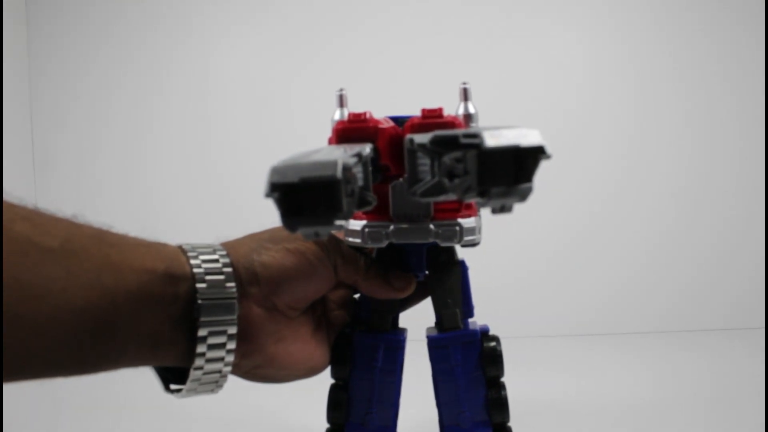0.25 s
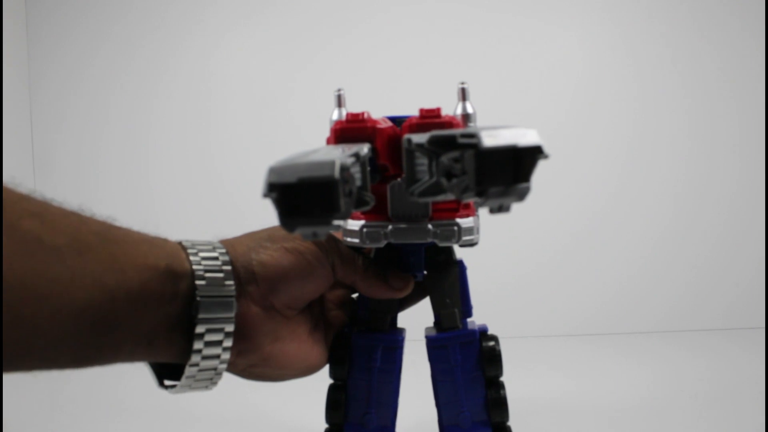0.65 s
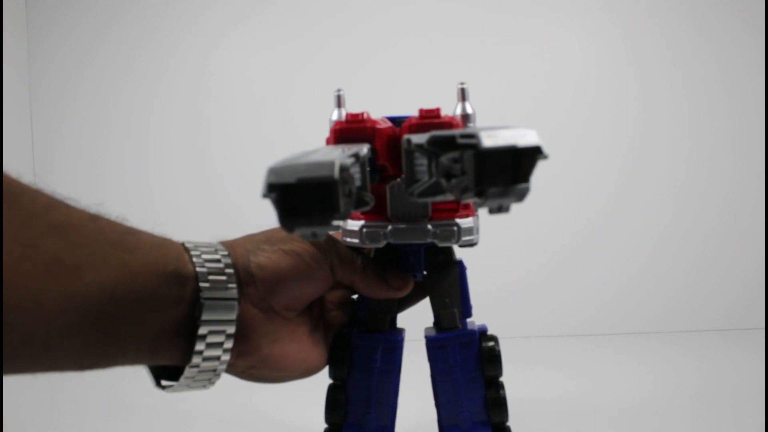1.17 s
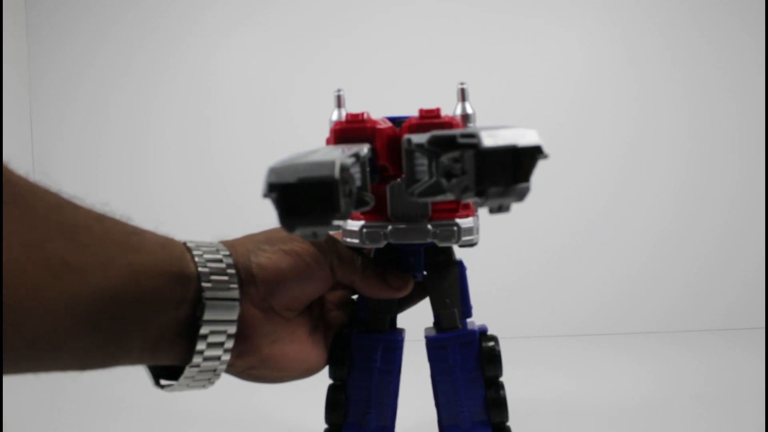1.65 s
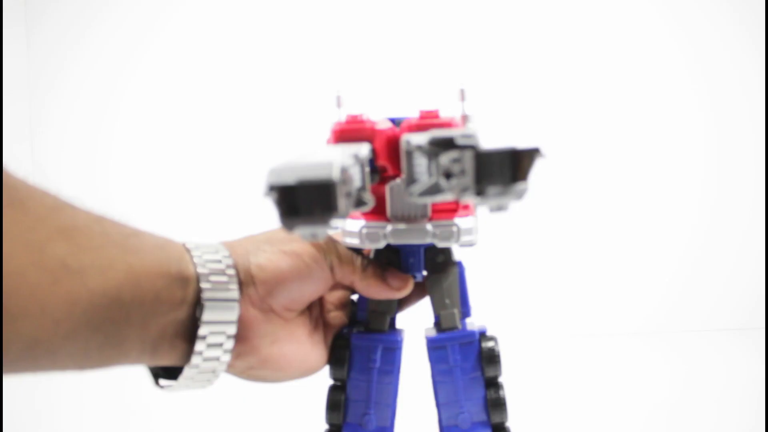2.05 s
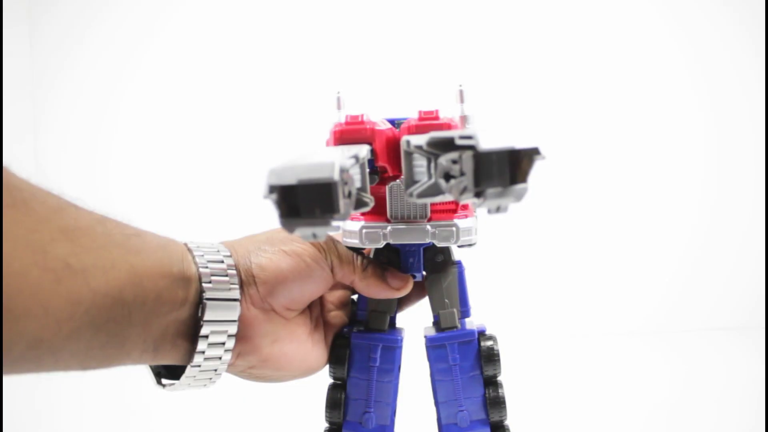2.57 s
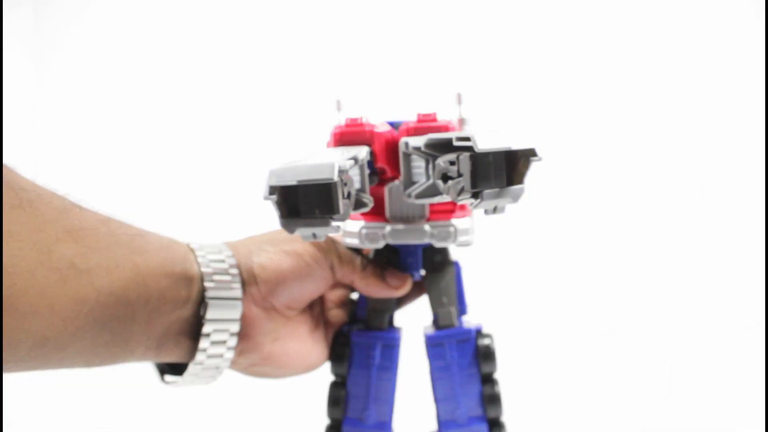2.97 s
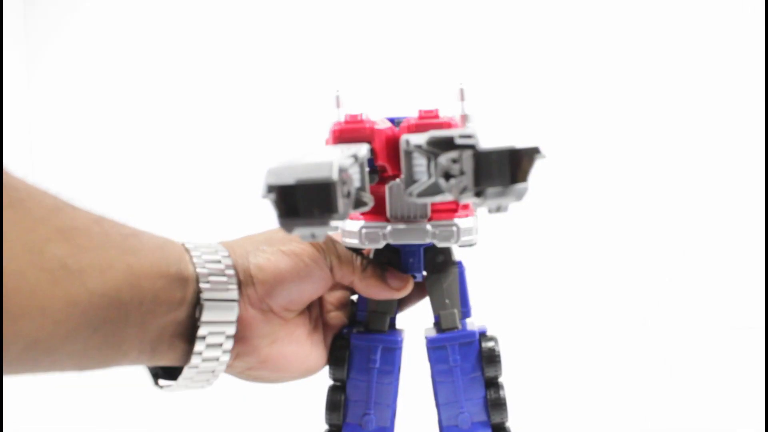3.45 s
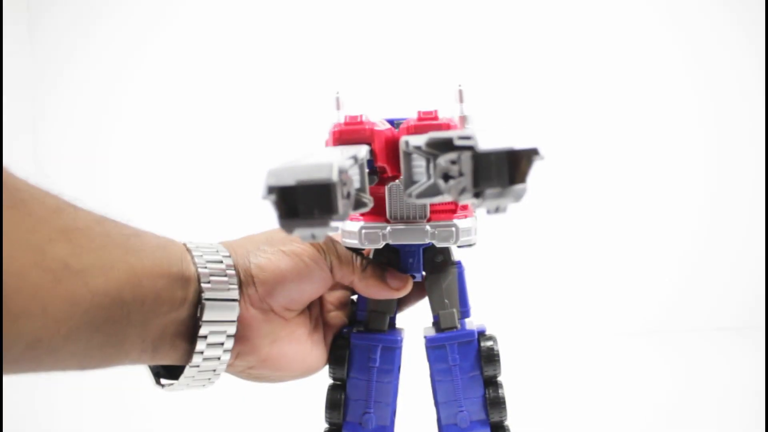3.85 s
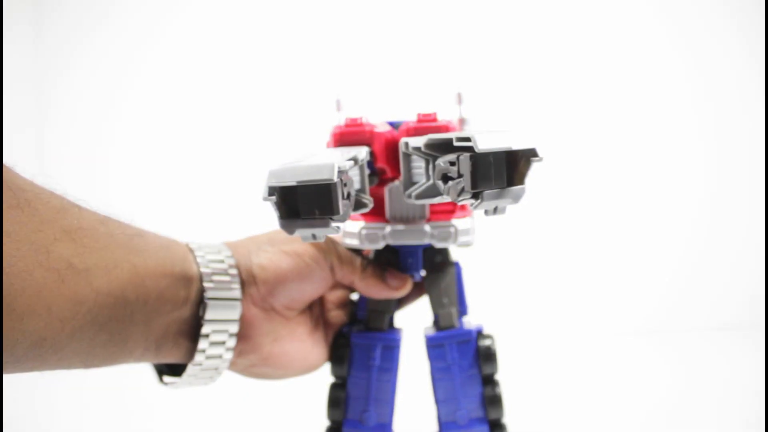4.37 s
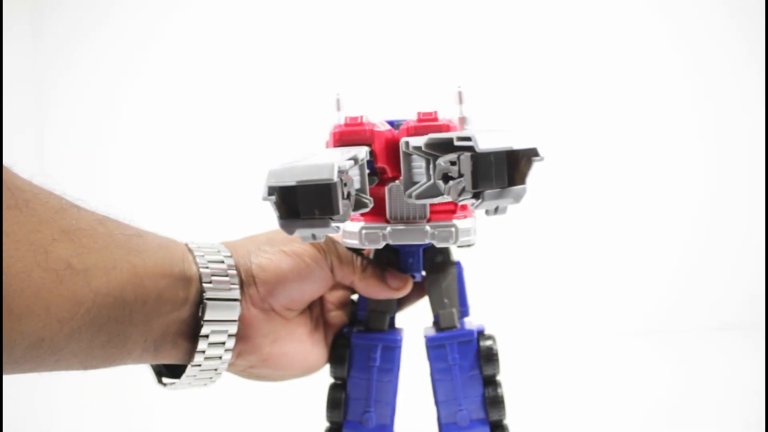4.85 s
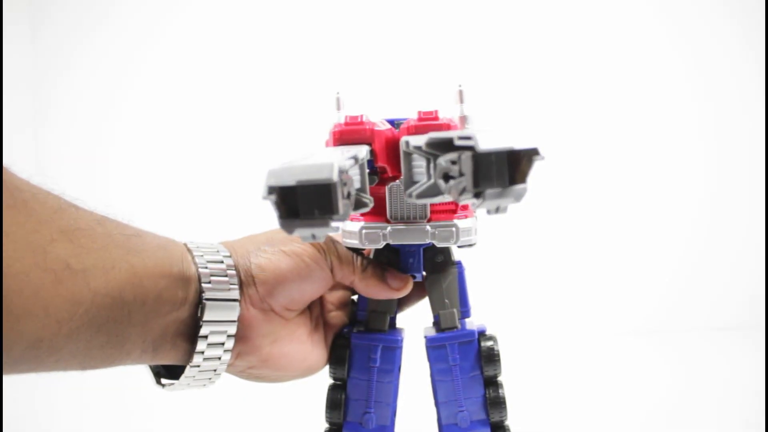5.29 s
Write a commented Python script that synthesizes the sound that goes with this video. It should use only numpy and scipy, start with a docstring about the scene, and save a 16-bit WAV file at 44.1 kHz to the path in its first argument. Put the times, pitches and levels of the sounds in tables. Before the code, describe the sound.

A camera lens clicks and rubs, then its focus motor whirs back and forth in short bursts over faint hiss.

```python
"""A button snaps over faint hiss and electronic whine: a camera hears its own mechanics in a quiet room.
The lens barrel rubs, plastic on plastic, and knocks on its stops. The geared focus motor then hunts,
teeth rattling and whining: two long runs, shorter swings, a row of tiny nudges. The iris steps now and
then in quick zips. The mechanics reach the built-in microphone through the resonant plastic housing."""
import sys
import numpy as np
from scipy import signal
from scipy.fft import rfft, irfft, next_fast_len
from scipy.io import wavfile
from scipy.ndimage import uniform_filter1d, map_coordinates

SR = 44100
rng = np.random.default_rng(int(sys.argv[2]) if len(sys.argv) > 2 else 0)


def transcribe(signal):
    """Save signal, clipped to [-1, 1], as a 16-bit WAV file at the path in sys.argv[1]."""
    frames = np.atleast_2d(signal).T
    limited = np.clip(frames, -1, 1)
    pcm = np.round(limited * 32767).astype(np.int16)
    wavfile.write(sys.argv[1], SR, pcm)


N = 243678

# Noise spectra. Each row: frequency in Hz, relative density in dB.
HISS_SPECTRUM = [(12, -56), (20, -27), (92, -21.5), (129, -7), (191, -21), (225, -8), (362, -12),
                 (549, -12.5), (746, -12.5), (1820, -15.5), (4810, -23), (5380, -24), (12100, -27),
                 (13500, -22.5), (15500, -35.5)]
SCRAPE_SPECTRUM = [(100, -19), (400, -8), (620, -3.5), (900, -5), (1500, -2.5), (2300, -6), (2800, -7.5),
                   (4500, -9), (7000, -18), (12000, -47)]
SLIDE_HISS_SPECTRUM = [(3000, -30), (4800, -12.5), (5450, -1.5), (6600, -13.5), (8500, 1.5), (10800, -0.5),
                       (11300, -12), (12800, -5), (14400, -11), (15700, -31)]
IRIS_SPECTRUM = [(80, -48), (200, -26), (350, -18), (620, -6), (820, -15.5), (1450, 2.5), (1850, -6),
                 (2350, -10), (2900, -9), (4100, -6), (7200, -14), (10000, -19.5), (13500, -20.5),
                 (15500, -36)]
GEAR_GRIND_SPECTRUM = [(30, -45), (100, -21.5), (300, -20.5), (500, -9), (850, -10), (1300, -1.5),
                       (2200, -5), (3300, -5.5), (4700, -6.5), (6500, -10.5), (8000, -17), (12000, -66)]
GEAR_TREBLE_SPECTRUM = [(3000, -48), (5500, -11), (7000, -4), (8500, -3), (11200, -8.5), (11700, -7.5),
                        (13500, -8.5), (15000, -13), (15600, -39)]
GEAR_CREEP_SPECTRUM = [(60, -11), (400, -10.5), (650, -7), (1000, -5.5), (1650, -0.5), (2400, -14),
                       (4500, -14), (5700, -18), (7000, -20.5), (10000, -27.5), (14000, -32)]
# Electronic whine. Each row: frequency in Hz, rms level in dB.
WHINE_TONES = [(360.7, -84), (1647, -88.5), (5001, -90.5), (5997, -94), (8000, -90), (9001, -91),
               (9997, -88), (10998, -92.5), (12995, -96.5), (13997, -93.5)]
# Background dips. Each row: start in seconds, hold in seconds, gain in dB.
BACKGROUND_DIPS = [(2.004, 0.02, -11), (3.607, 0.014, -12)]
# Button and iris snaps. Each row: start in seconds, relative level in dB, chatter t60 in seconds,
# relative thump in dB.
SNAP_HITS = [(0.0095, -24.5, 0.0086, -2), (0.0107, -7.5, .012, 1), (2.2847, -26.5, 0.015, -15),
             (2.287, -19, 0.016, -19.5)]
# Resonances of a snapping part. Each row: centre in Hz, width in Hz, relative level in dB.
SNAP_MODES = [(1490, 340, -3.5), (2050, 400, -7), (3580, 220, -2), (3960, 360, -1.5), (5680, 520, -2),
              (7414, 380, -2), (8930, 330, -1), (9416, 320, 0), (10900, 450, -7.5), (12940, 630, -12)]
# Barrel pushes. Each row: time of full speed, 20 dB rise, hold and 20 dB fall, all in seconds,
# then relative scrape and hiss levels in dB.
BARREL_PUSHES = [(.195, .035, .006, .045, -58.5, -65), (.243, .035, .06, .016, -56.5, -58),
                 (.94, .02, .045, .09, -61.5, -62), (1.151, .075, .003, .04, -62, -59),
                 (1.272, .072, .008, .058, -52, -43), (1.34, .04, .012, .16, -60, -63.5),
                 (1.524, .052, 0.011, .17, -62, -57), (1.937, .055, 0.01, .056, -57, -56)]
# Barrel squeaks. Each row: time of full level in seconds, hold in seconds, pitch in Hz, level in dB.
BARREL_SQUEAKS = [(0.241, .06, 708, -61.5), (1.257, 0.022, 708, -50), (1.52, 0.062, 1205, -65.5)]
# Barrel meeting its stops. Each row: start in seconds, ring peak in dB, relative tick in dB.
STOP_KNOCKS = [(.249, -41, -9), (0.903, -41, 3.5), (0.9067, -40.5, -9), (1.811, -44, -6), (1.9063, -16, -4)]
# Barrel modes. Each row: frequency in Hz, relative level in dB, t60 in seconds.
BARREL_MODES = [(560, -19, 0.041), (766, -30, .022), (960, -17, 0.021), (1250, 3.5, 0.034),
                (1480, 6.5, 0.01), (1690, 3.5, 0.028), (2610, -15.5, 0.048), (3440, -13, 0.015),
                (4960, -5, .011), (5670, -6.5, 0.026)]
# Small contacts. Each row: start in seconds, relative level in dB.
SLIDE_CATCHES = [(1.712, -59.5), (1.814, -49.5), (1.842, -58), (1.85, -55.5), (1.887, -57)]
HOUSING_BUMPS = [(0.245, -54.5), (2.292, -49), (2.78, -52), (3.18, -49), (3.822, -53.5), (4.458, -59),
                 (5.424, -53.5)]
PLASTIC_TICKS = [(0.642, -54), (0.684, -50.5), (0.708, -49), (0.956, -55.5), (0.983, -52), (1.005, -55)]
GEAR_CLACKS = [(2.917, -50), (3.194, -32), (3.925, -52), (4.523, -61), (4.591, -53), (5.515, -43)]
# Iris steps. Each row: start in seconds, hold in seconds, level in dB.
IRIS_STEPS = [(2.2695, 0.014, -44.5), (2.772, .012, -41.5), (3.174, .012, -42.7), (3.805, .006, -44.5),
              (4.44, 0.011, -44), (5.4095, .004, -38.5), (5.512, .005, -41)]
# Focus runs. Each row: start in seconds, powered time in seconds, target shaft speed in Hz, braking fade
# in dB per second, relative drive level in dB, treble and orders 3, 5 and 6 in dB relative to the drive,
# treble flutter depth in dB.
FOCUS_RUNS = [(2.272, 0.069, 221.8, 454, -37.5, -6.5, -19, -20, -21, 1),
              (2.877, .209, 234, 620, -37, -6, -6.7, -24, -32, 0.89),
              (3.173, .306, 223, 820, -35.7, -4.6, -6, -7.7, -7, 2.4),
              (3.803, 0.073, 230.2, 517, -35.5, -8, -10.5, -19, -7, 1),
              (3.944, 0.06, 232.1, 490, -35.2, -8.3, -13.5, -21, -6.5, 1),
              (4.076, 0.036, 219.3, 442, -36.6, -9.5, -22, -22, -17, 1),
              (4.437, 0.023, 215.4, 560, -37, -14, -24, -22, -14.5, 1),
              (5.409, .043, 220, 450, -34.5, -10, -19, -22, -10.5, 1),
              (5.511, .012, 220, 549, -35.5, -1, -22, -20, -18, 1)]
# Strong gear orders. Each row: shaft order, resonance in Hz, half-width in Hz.
STRONG_ORDERS = [(3, 691.4, 46), (5, 1115, 43), (6, 1220, 110)]
# Weak gear orders. Each row: shaft order, relative level in dB.
WEAK_ORDERS = [(1, -14.5), (2, -12), (4, 6), (7, -16), (8, -2), (9, 5), (10, 7.5), (11, -16), (12, -3.5),
               (13, -8), (15, 10), (16, -14), (17, -9), (18, 5), (20, 3.5)]
# Housing resonances. Each row: centre in Hz, width in Hz, lift in dB.
HOUSING_MODES = [(707, 122, 15), (925, 37, 9.5), (1145, 71, 13), (1480, 247, 9.5), (1843, 440, 11),
                 (2402, 93, 11.5), (2705, 184, 15.5), (2903, 173, 11), (3666, 165, 9), (3950, 204, 12),
                 (5300, 470, 10), (5840, 470, 6), (9040, 220, 14.5), (9870, 320, 10.5), (10630, 390, 20),
                 (13200, 600, 9.5)]
# Focus nudges. Each row: start in seconds, nominal length in seconds, relative level in dB.
FOCUS_NUDGES = [(4.578, 0.073, -49.5), (4.674, 0.068, -49), (4.808, 0.058, -48), (4.907, 0.056, -48.5),
                (5.011, 0.069, -48), (5.105, 0.082, -48), (5.208, 0.06, -49), (5.309, 0.07, -49.5)]
# Room decay. Each row: frequency in Hz, t60 in seconds.
ROOM_DECAY = [(150, .55), (1500, .5), (4000, 0.23), (9000, 0.48), (15000, .15)]


def amp(db):
    """Decibels to gain."""
    return 10 ** (np.asarray(db) / 20)


def unit(x):
    """Scale to rms 1."""
    return x / np.sqrt(np.mean(x ** 2) + 1e-20)


def along(points, hz):
    """Interpolate (Hz, value) points on a log axis."""
    point_hz, values = np.transpose(points)
    return np.interp(np.log(hz + 1), np.log(point_hz + 1), values)


def wobble(rate_hz):
    """Smooth random curve, rate_hz knots a second."""
    knots = rng.standard_normal(int(N * rate_hz / SR) + 4)
    return map_coordinates(knots, [np.arange(N) * rate_hz / SR])


def filtered(x, response):
    """Apply a frequency response."""
    size = next_fast_len(x.shape[-1] + SR // 4)
    return irfft(rfft(x, size) * response(np.fft.rfftfreq(size, 1 / SR)), size)[:x.shape[-1]]


def coloured(x, spectrum, lifts=()):
    """Apply a spectrum plus (Hz, width Hz, dB) lifts; rms 1."""
    def response(hz):
        lift_db = sum(db / (1 + (2 * (hz - centre) / width) ** 2) for centre, width, db in lifts)
        return amp(along(spectrum, hz) + lift_db)
    return unit(filtered(x, response))


def resonated(x, modes):
    """Ring x through (Hz, width Hz, dB) resonances of alternating sign."""
    def response(hz):
        return sum((-1) ** k * amp(db) * 1j * hz * width / (centre ** 2 - hz ** 2 + 1j * hz * width)
                   for k, (centre, width, db) in enumerate(modes))
    return filtered(x, response)


def grit(spread_db):
    """Dense micro-impacts of uneven size."""
    return rng.standard_normal(N) * amp(spread_db * wobble(1800))


def burst(t60_s, modes):
    """Dying contact chatter through resonances; initial rms near 1."""
    t = np.arange(SR // 5) / SR
    spectrum = rfft(rng.choice([-1., 1.], len(t)) * amp(-60 * t / t60_s))
    # Hard contacts excite all frequencies about evenly.
    power = np.abs(uniform_filter1d(np.abs(spectrum) ** 2, size=110))
    chatter = irfft(spectrum / np.sqrt(power + 1e-9), len(t)) * (t < t[-1] / 2)
    ring = resonated(chatter, modes)
    return ring / np.linalg.norm(ring) * np.sqrt(t60_s * SR / 6)


def swell(full_s, rise_s, hold_s, fall_s):
    """Gain 1 from full_s for hold_s; steepening flanks, 20 dB down at rise_s and fall_s."""
    t = np.arange(N) / SR - full_s
    away = np.maximum(-t / rise_s, (t - hold_s) / fall_s)
    return amp(-20 * np.clip(away, 0, 3) ** 1.4) * (away < 3)


def add(track, start_s, sound):
    """Mix a sound in at start_s."""
    part = track[max(round(start_s * SR), 0):][:len(sound)]
    part += sound[:len(part)]


def background():
    """Room tone and preamplifier hiss with thin electronic tones; the level dips twice."""
    t = np.arange(N) / SR
    whine = sum(amp(db) * np.sqrt(2) * np.sin(2 * np.pi * hz * t + .3 * wobble(6))
                for hz, db in WHINE_TONES)
    hiss = amp(-68.5) * coloured(rng.standard_normal(N), HISS_SPECTRUM)
    dip_db = sum(db * swell(start_s, .003, hold_s, .003) for start_s, hold_s, db in BACKGROUND_DIPS)
    return amp(dip_db) * (hiss + whine)


def snaps():
    """A sprung part chatters, thumps the body and leaves it ringing."""
    out = np.zeros(N)
    body = resonated(signal.unit_impulse(SR // 5), [(359.7, 200, 0)])
    for start_s, db, t60_s, thump_db in SNAP_HITS:
        crack = amp(-1) * burst(t60_s, SNAP_MODES)
        crack += amp(-8) * burst(t60_s, [(1700, 1400, -1.4), (6250, 3000, -2), (9895, 3500, -1.2)])
        thump = amp(thump_db - 2.5) * body / np.abs(body).max()
        ring = amp(-21) * burst(.06, [(1520, 480, -1), (3200, 1300, -5), (9000, 670, -4.5)])
        add(out, start_s, amp(db) * (crack + thump + ring))
    return out


def barrel_rub():
    """Plastic slides on plastic: scrape, fine hiss, resonant squeaks, brief catches."""
    scrape, hiss = np.zeros((2, N))
    for full_s, rise_s, hold_s, fall_s, scrape_db, hiss_db in BARREL_PUSHES:
        speed = swell(full_s, rise_s, hold_s, fall_s)
        scrape += amp(scrape_db) * speed ** .65
        hiss += amp(hiss_db) * speed
    scrape_lifts = [(669.2, 43, 5.9), (1175, 68, 6.6), (1530, 860, 4.8), (2147, 200, 1.8)]
    hiss_lifts = [(5380, 270, 5.6), (8850, 350, 2.2), (10650, 300, 3.2)]
    scrape *= coloured(grit(spread_db=1.5), SCRAPE_SPECTRUM, scrape_lifts)
    hiss *= coloured(grit(spread_db=2.5), SLIDE_HISS_SPECTRUM, hiss_lifts)
    out = amp(-2) * scrape + amp(.04) * hiss
    for full_s, hold_s, hz, db in BARREL_SQUEAKS:
        squeak_modes = [(hz, 38, 2.5), (1520, 130, -6.5), (14176, 250, -15.5)]
        squeak = unit(resonated(grit(spread_db=3.5), squeak_modes))
        out += amp(db) * swell(full_s, .075, hold_s, .036) * squeak
    catch_modes = [(5300, 460, -5), (8900, 950, 2), (10600, 700, -2), (13130, 480, -13)]
    for start_s, db in SLIDE_CATCHES:
        add(out, start_s, amp(db) * burst(.012, catch_modes))
    return out


def housing_ticks_and_bumps():
    """The plastic housing ticks faintly and bumps dully; most bumps come just after an iris step."""
    out = np.zeros(N)
    for start_s, db in PLASTIC_TICKS:
        add(out, start_s, amp(db - 9.5) * burst(.048, [(2097, 640, 0), (3280, 760, 0)]))
    for start_s, db in HOUSING_BUMPS:
        add(out, start_s, amp(db) * burst(.03, [(121, 58, -3), (404, 150, .95)]))
    return out


def barrel_knocks():
    """A bright contact tick, then the barrel's modes; so small a part radiates no bass."""
    out, t = np.zeros(N), np.arange(SR // 5) / SR
    for start_s, db, tick_db in STOP_KNOCKS:
        ring = sum(amp(mode_db + rng.normal(0, 1) - 60 * t / t60_s) * np.sin(2 * np.pi * hz * t)
                   for hz, mode_db, t60_s in BARREL_MODES)
        tick = burst(.0035, [(5330, 330, -.5), (8200, 990, -6), (10160, 720, 3)])
        add(out, start_s, amp(db) * ring / np.abs(ring).max())
        add(out, start_s - .0005, amp(db + tick_db - 8) * tick)
    return signal.sosfilt(signal.butter(N=4, Wn=440, btype="high", fs=SR, output="sos"), out)


def iris(rise_s=.0024):
    """The blades jerk into motion and step in quick zips."""
    drive = np.zeros(N)
    for start_s, hold_s, db in IRIS_STEPS:
        travel = swell(start_s + rise_s, rise_s, hold_s, fall_s=.017)
        jerk = amp(-10) * swell(start_s + rise_s, rise_s, hold_s=0, fall_s=.006)
        drive += amp(db) * (travel + jerk)
    return drive * coloured(grit(spread_db=1.5), IRIS_SPECTRUM, [(8970, 1100, 12.6), (10350, 730, 11.6)])


def motor_motion(start_hz=154.8, spin_up_s=.038, engage_s=.0098, treble_fade_db_per_s=480):
    """Speed and gain curves: each run spins up, then fades as it brakes, treble first."""
    t = np.arange(SR // 2) / SR
    shaft_hz = np.full(N, start_hz)
    speed_share, drive, treble_gain, flutter_db = np.zeros((4, N))
    order_gains = np.zeros((len(STRONG_ORDERS), N))
    for start_s, powered_s, target_hz, fade_db_per_s, db, treble_db, *orders_db, depth_db in FOCUS_RUNS:
        speed = 1 - (1 - start_hz / target_hz) * np.exp(-t / spin_up_s)
        off_s = np.maximum(t - powered_s, 0)
        grip = 1 - np.exp(-t / engage_s)
        gain = amp(db - fade_db_per_s * off_s) * grip * speed
        add(drive, start_s, gain)
        add(treble_gain, start_s, gain * amp(treble_db - treble_fade_db_per_s * off_s) * speed ** 2.7)
        for track, order_db in zip(order_gains, orders_db):
            add(track, start_s, gain * amp(order_db))
        at = round(start_s * SR)
        speed_share[at:at + len(t)] = speed[:N - at]
        shaft_hz[at:at + len(t)] = target_hz * speed[:N - at]
        flutter_db[at:] = depth_db
    return shaft_hz, speed_share, drive, treble_gain, order_gains, flutter_db


def focus_motor(reduction=6):
    """Gear teeth rattle the housing once a shaft turn and whine on the shaft's orders."""
    shaft_hz, speed_share, drive, treble_gain, order_gains, flutter_db = motor_motion()
    angle = 2 * np.pi * np.cumsum(shaft_hz * (1 + .002 * wobble(70))) / SR
    mesh = unit(amp(2 * np.cos(angle) + .75 * wobble(170)))
    flutter = amp(flutter_db * np.cos(angle / reduction))  # from a slower wheel
    grind = amp(-1.5) * coloured(grit(spread_db=-1), GEAR_GRIND_SPECTRUM, HOUSING_MODES)
    treble = amp(-.6) * coloured(grit(spread_db=-1), GEAR_TREBLE_SPECTRUM, HOUSING_MODES)
    rattle = mesh * (drive * grind + treble_gain * flutter * treble)

    def partial(order):
        return np.sqrt(2) * amp(1.16 * wobble(30)) * np.sin(order * angle + .036 * order * wobble(45))

    # Load and direction decide which gear pair sings loudest.
    whine = np.zeros(N)
    for gain, (order, centre_hz, half_width_hz) in zip(order_gains, STRONG_ORDERS):
        resonance = 1 / (1 + ((order * shaft_hz - centre_hz) / half_width_hz) ** 2)
        whine += gain * resonance * partial(order)
    weak_whine = unit(sum(amp(db) * partial(order) for order, db in WEAK_ORDERS))
    whine += amp(-10) * drive * speed_share ** 5.8 * weak_whine
    # A lightly damped part picks up order 5 and rings on.
    ring = resonated(whine, [(1112, 2.1, -19)])
    return rattle + whine + ring


def gear_clacks():
    """Teeth meet as the train takes up its play; it rings briefly."""
    out = np.zeros(N)
    for start_s, db in GEAR_CLACKS:
        add(out, start_s, amp(db) * burst(.022, [(1596, 100, 9), (2781, 300, -11), (5500, 1500, -32)]))
    return out


def focus_nudges():
    """Creeping gears make only a soft, dull rasp."""
    drive = sum(amp(db) * swell(start_s + .021, rise_s=.028, hold_s=.16 * length_s, fall_s=.043)
                for start_s, length_s, db in FOCUS_NUDGES)
    return drive * amp(.35) * coloured(grit(spread_db=3), GEAR_CREEP_SPECTRUM, HOUSING_MODES)


def room(x):
    """Diffuse room tail, shorter in the treble."""
    bin_hz, t, noise = signal.stft(rng.standard_normal(SR // 2), SR, nperseg=256)
    decay = amp(-60 * t / along(ROOM_DECAY, bin_hz)[:, None])
    tail = signal.istft(noise * decay, SR, nperseg=256)[1]
    wet = signal.fftconvolve(x, tail / np.linalg.norm(tail))[:N]
    colour = [(200, -9.5), (1400, -.5), (3500, .5), (6000, -8.5), (9500, -6.5), (14000, -11.5)]
    return filtered(wet, lambda hz: amp(along(colour, hz)))


def scene():
    """The mechanics arrive mostly through the housing, with little room."""
    clicks = snaps() + barrel_knocks() + gear_clacks()
    lens = focus_motor() + focus_nudges() + iris() + barrel_rub() + housing_ticks_and_bumps()
    reverb = room(amp(-27) * clicks + amp(-28) * lens)
    return (clicks + lens + reverb + background())[None]


def record(dry):
    """The camera trims the lowest bass and cuts everything above its band limit."""
    low_hz, top_hz, taper_hz = 60, 15750, 600
    lean = signal.sosfilt(signal.butter(N=2, Wn=low_hz, btype="high", fs=SR, output="sos"), dry)
    return np.array([filtered(channel, lambda hz: np.clip((top_hz - hz) / taper_hz, 0, 1))
                     for channel in lean])


dry = scene()
out = record(dry)
transcribe(out)
```